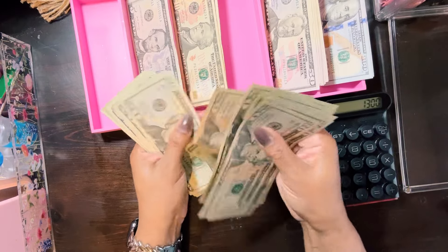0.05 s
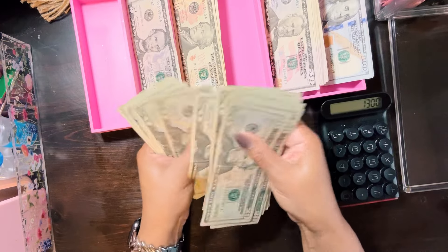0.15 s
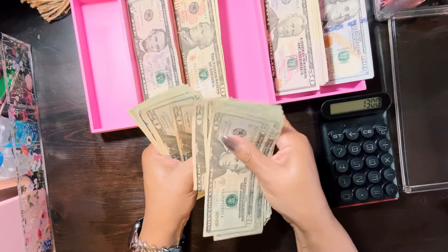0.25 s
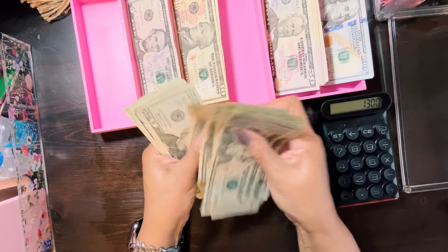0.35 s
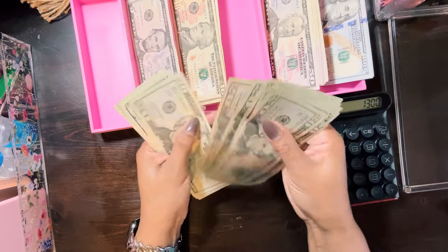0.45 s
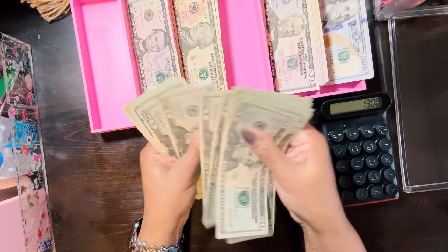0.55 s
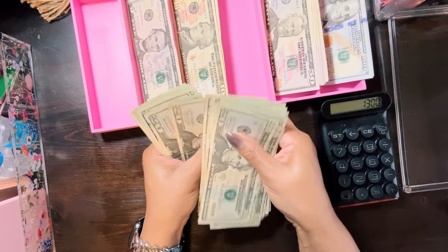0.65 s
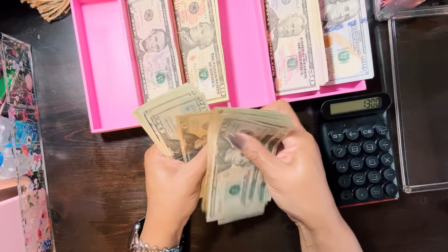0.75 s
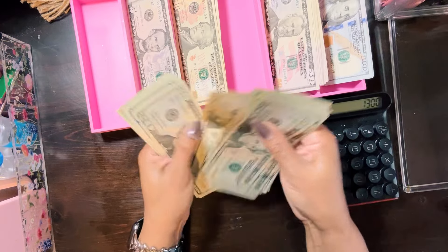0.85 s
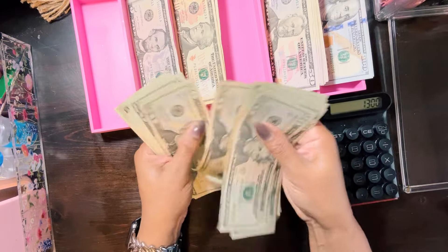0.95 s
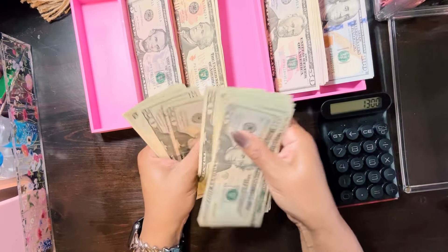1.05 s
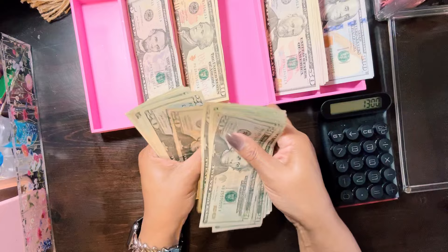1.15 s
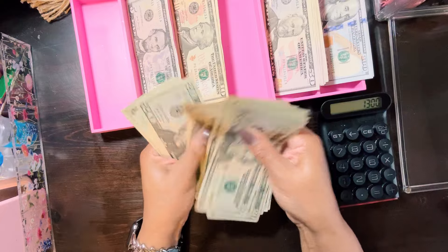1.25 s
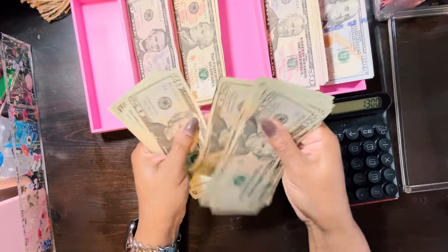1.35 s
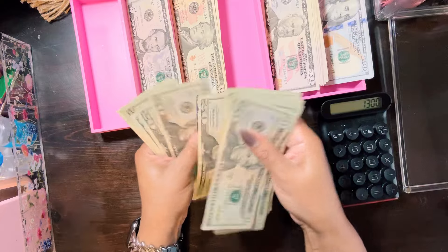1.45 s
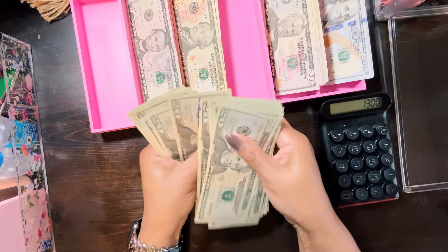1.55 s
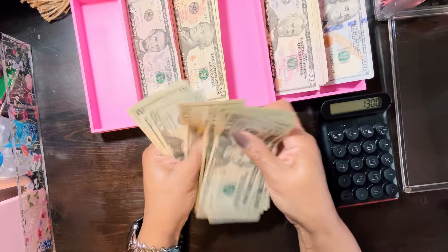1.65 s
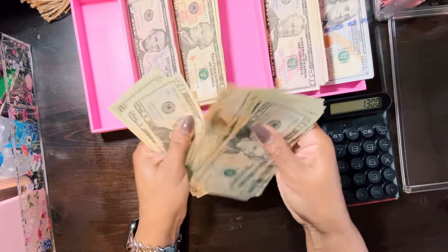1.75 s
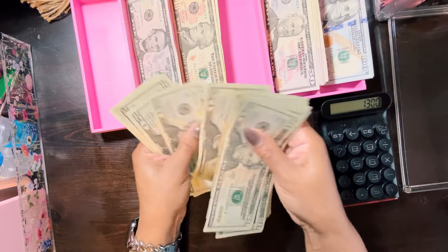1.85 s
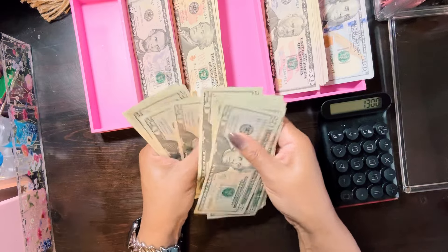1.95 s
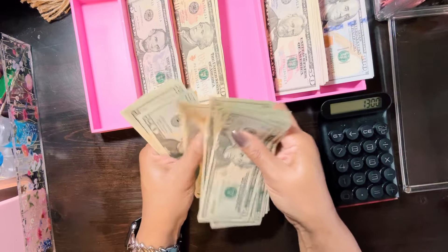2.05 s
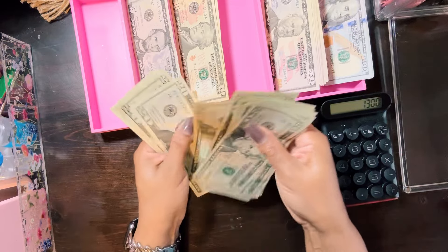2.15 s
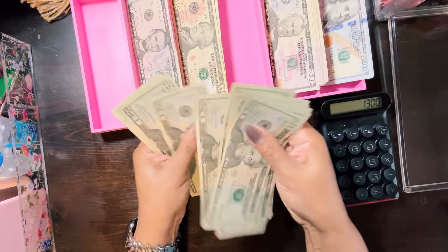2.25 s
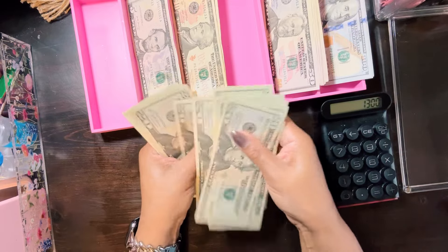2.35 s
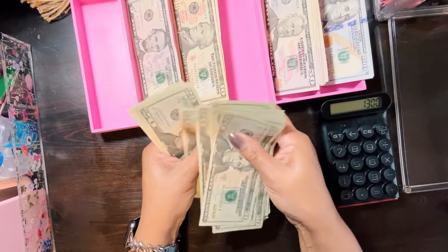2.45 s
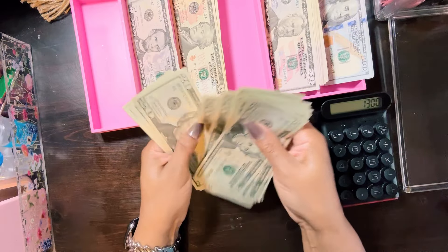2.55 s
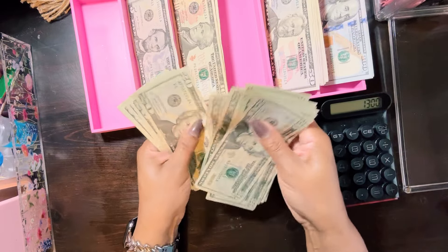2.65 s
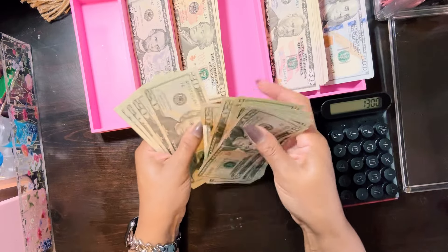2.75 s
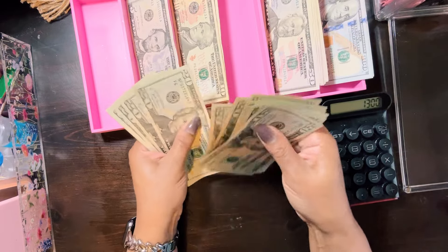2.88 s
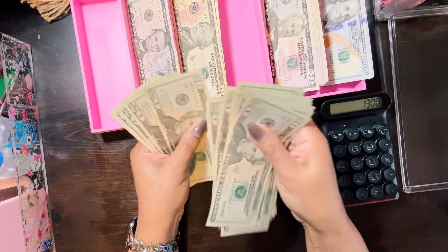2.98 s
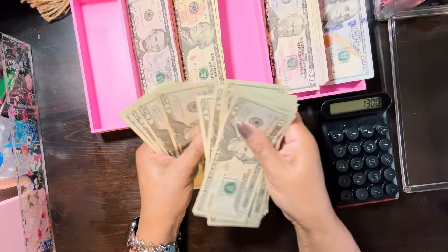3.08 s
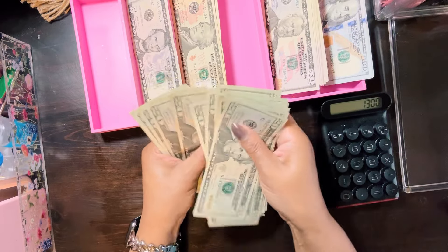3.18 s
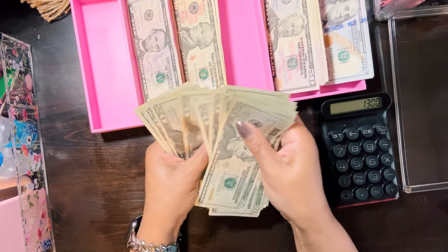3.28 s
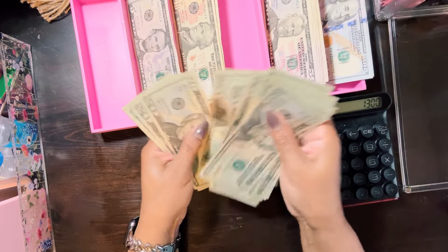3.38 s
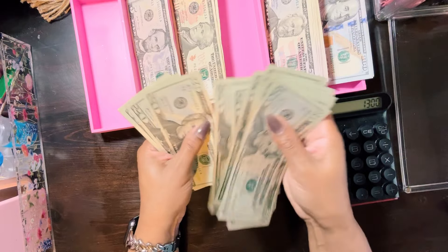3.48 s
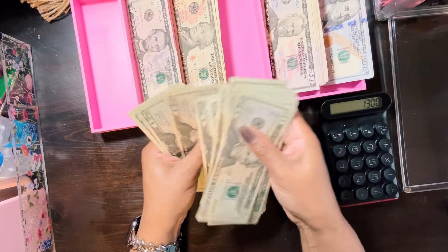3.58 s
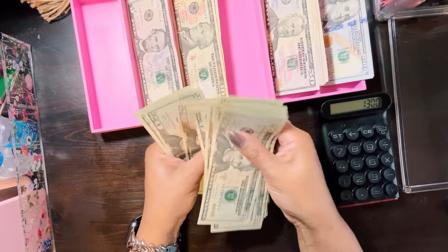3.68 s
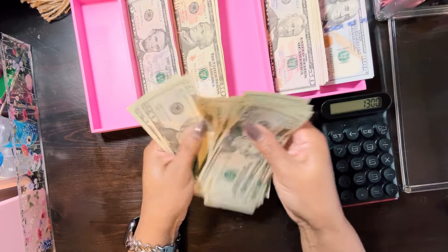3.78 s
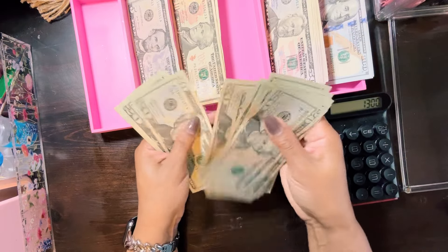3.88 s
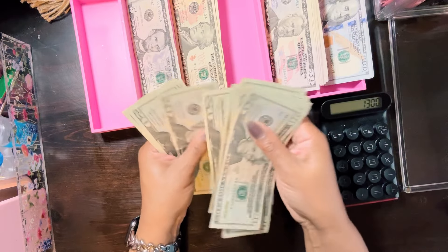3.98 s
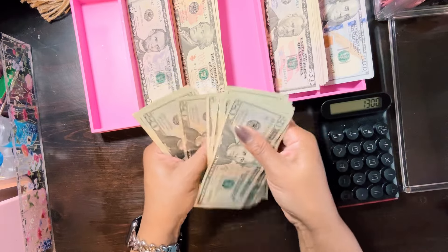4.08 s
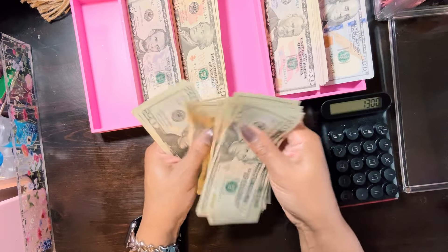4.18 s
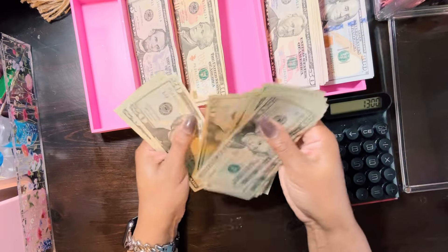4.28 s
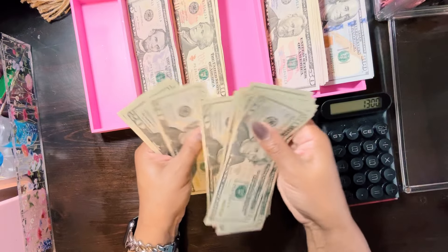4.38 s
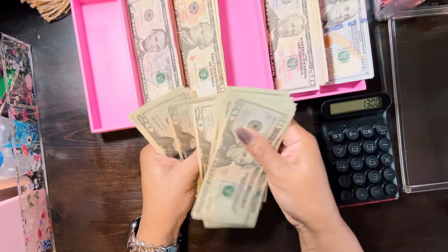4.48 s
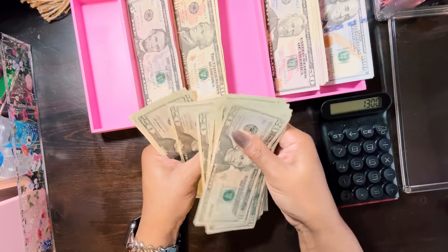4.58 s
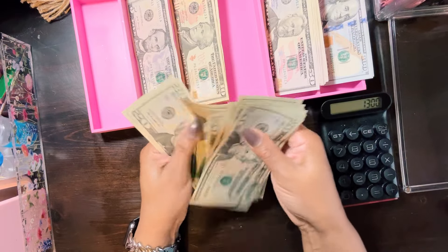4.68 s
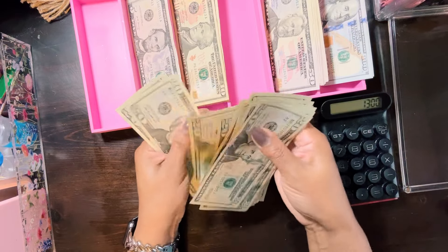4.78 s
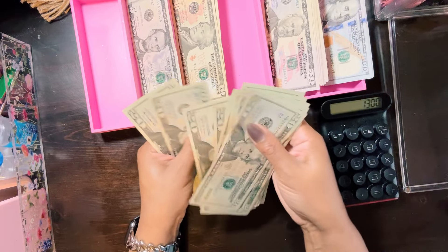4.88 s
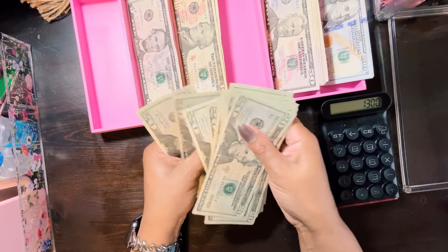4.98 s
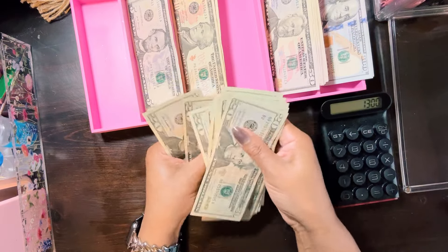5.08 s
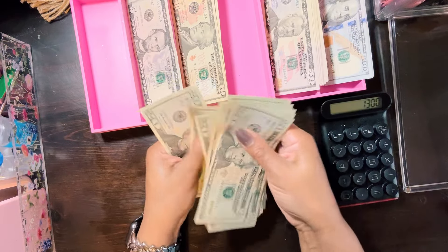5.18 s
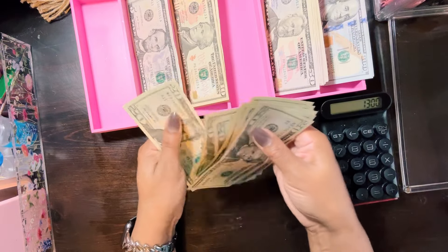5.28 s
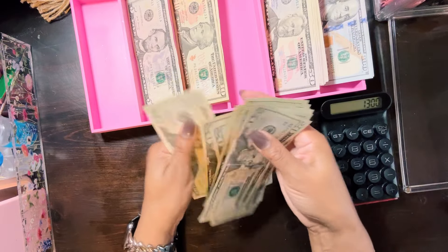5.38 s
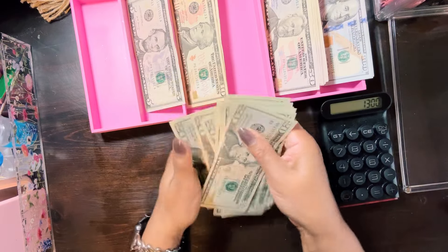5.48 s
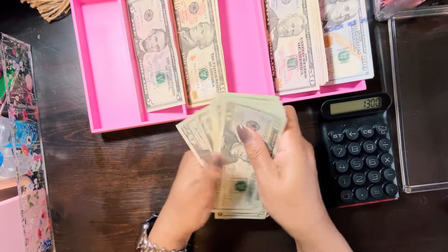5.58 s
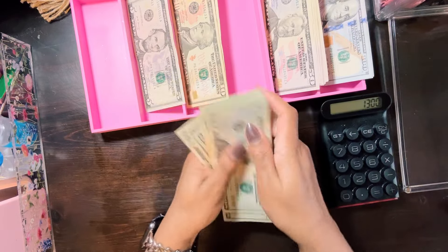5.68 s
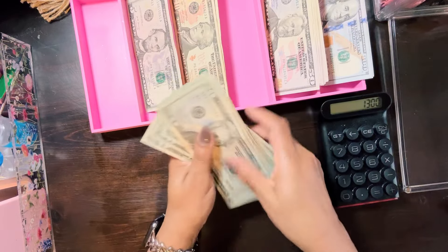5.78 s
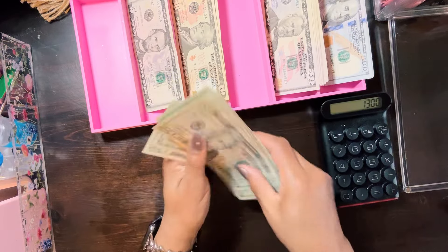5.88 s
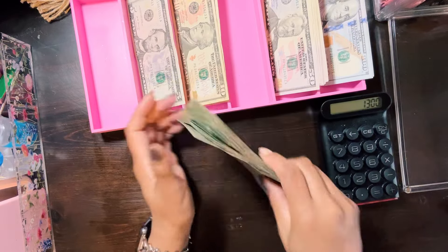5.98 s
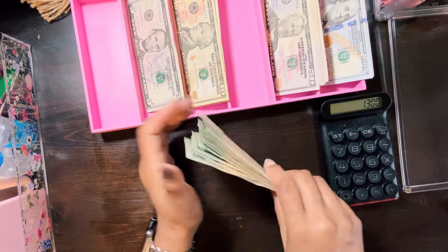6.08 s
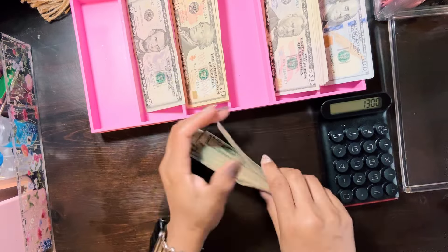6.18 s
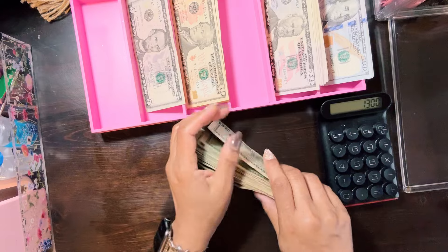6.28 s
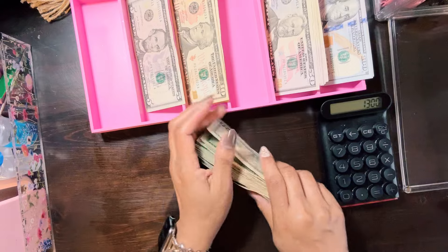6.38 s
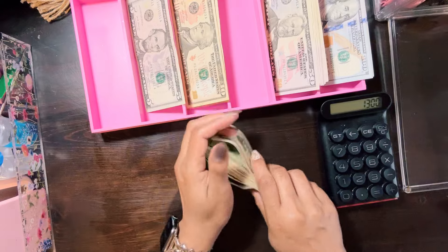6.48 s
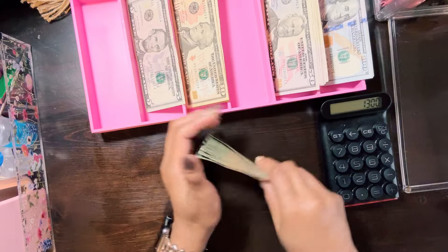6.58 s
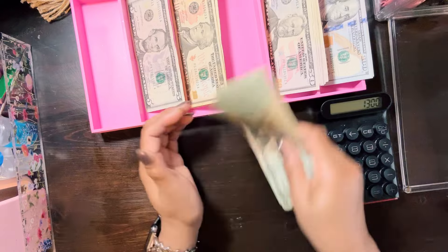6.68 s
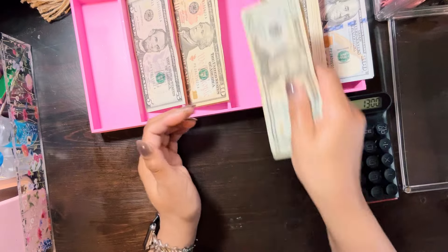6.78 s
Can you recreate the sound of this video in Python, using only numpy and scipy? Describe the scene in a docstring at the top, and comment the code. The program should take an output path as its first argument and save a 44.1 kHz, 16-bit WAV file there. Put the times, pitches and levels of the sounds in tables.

```python
"""Paper notes are counted by hand over a wooden desk, close under a phone with two microphone openings.
Each note rubs off the stack with a grainy hiss and pushes out a puff of air as it lands. Creases snap,
thumbs flick edges, and one note squeaks as it rubs. At the end the stack is knocked on the desk.
The small, soft room adds a short echo, and the house rumbles quietly underneath."""
import sys
import numpy as np
from scipy import signal
from scipy.fft import rfft, irfft, next_fast_len
from scipy.io import wavfile
from scipy.ndimage import uniform_filter1d, map_coordinates

SR = 44100
rng = np.random.default_rng(int(sys.argv[2]) if len(sys.argv) > 2 else 0)


def store_wav(level_fs):
    """Save 16-bit WAV to argv[1]."""
    pcm = np.round(np.clip(np.atleast_2d(level_fs), -1, 1) * 32767)
    wavfile.write(sys.argv[1], SR, pcm.T.astype(np.int16))


N = 301644

# A note is drawn off, or the stack is squared: t/s, length/s, rub level/dB, hiss level/dB
SLIDES = [(-.05, 0.034, -33.5, -36.5), (0.163, 0.012, -48, -57), (0.357, 0.052, -40, -41.5),
          (0.607, 0.0065, -47.5, -70), (0.813, 0.074, -40, -43), (1.258, 0.083, -41.5, -43.5),
          (1.675, 0.085, -40, -39), (1.918, 0.059, -50, -53), (2.065, 0.073, -46, -45),
          (2.508, 0.076, -40, -46), (2.671, 0.0063, -41, -45), (2.882, 0.0074, -49, -69),
          (3.335, 0.075, -45.5, -43), (3.739, 0.076, -47, -46), (3.935, 0.018, -56, -54.5),
          (4.194, 0.062, -46.5, -45.5), (4.649, 0.089, -47.5, -43.5), (5.172, 0.1, -47.5, -50),
          (5.415, 0.057, -53, -53.5), (5.739, 0.1, -55.5, -52), (5.926, 0.024, -63, -52.5),
          (6.528, 0.042, -51, -57.5)]
# Fingers shift the notes, as strong as just after a slide: t/s, rub level/dB, hiss level/dB
FINGERING = [(0, -69, -73), (.3, -50, -56), (.6, -61, -63.5), (1.07, -52, -47), (1.19, -55, -62),
             (1.4, -52, -57), (1.9, -54.5, -56), (2.5, -47, -55), (3.1, -57, -62), (3.601, -58, -57),
             (3.9, -58.5, -61.5), (4.4, -56, -54.5), (4.8, -58, -54.5), (4.9, -54, -52), (5.362, -64, -71),
             (5.62, -51.5, -50.5), (5.98, -58.5, -56), (6.07, -80, -73.5), (6.145, -50, -61),
             (6.2, -38.5, -59), (6.36, -43.5, -60), (6.42, -43.5, -54.5), (6.49, -47, -58),
             (6.601, -62.5, -76), (6.668, -86, -97), (6.84, -77, -75)]
# The broad pitches at which the held stack rings: f/Hz, width/Hz, level/dB
STACK_RESONANCES = [(873, 350, 8), (1820, 286, 9), (2586, 610, 5.5), (4130, 740, 2.5), (6100, 2550, -6)]
# The tone of hissing paper fibres: f/Hz, level/dB
HISS_TONE = [(2000, -14.5), (4500, -2.5), (6500, 0), (8500, -0.5), (11000, -2.5), (14000, -5), (15800, -11)]
# The tone of a flapping note: f/Hz, level/dB
FLAP_TONE = [(60, -4.5), (130, -4), (300, 4.5), (500, 7.5), (900, -84.5)]
# The tone of the house's rumble: f/Hz, level/dB
RUMBLE_TONE = [(15, -80), (25, -47), (42, -10), (64, -0.5), (87, -10), (110, -4), (140, -8.5), (195, -20),
               (887, -33), (1650, -29.5), (2910, -43), (10700, -55), (14000, -47), (16000, -59)]
# The loudness that the rumble wavers around: t/s, level/dB
RUMBLE_LEVELS = [(0, -64), (2, -65), (4.5, -65.5), (6, -65.5), (6.84, -66.5)]
# A note lands and pushes out air: t/s, level/dB, f/Hz
LANDINGS = [(0.009, -42, 380), (0.07, -39.5, 400), (0.38, -51.5, 398), (0.441, -44.5, 337),
            (0.619, -50, 271), (0.81, -39.5, 344), (0.866, -40, 347), (1.312, -38, 407),
            (1.742, -43.5, 149), (2.101, -45, 340), (2.145, -44.5, 149), (2.185, -47.5, 148),
            (2.58, -49, 108), (2.659, -39.5, 410), (3.406, -43.5, 176), (3.534, -64, 253),
            (3.876, -46.5, 112), (4.134, -51.5, 354), (4.256, -52, 104), (4.751, -53, 95),
            (5.242, -52, 153), (5.833, -59, 123), (6.153, -33.5, 323), (6.372, -46, 297),
            (6.51, -49.5, 130)]
# Creases, flicks and knocks: t/s, level/dB, f/Hz, fade/s, crack offset/dB
# (a fade is the time a sound takes to drop by 60 dB)
PAPER_SNAPS = [(0.075, -17, 1980, 0.017, -18), (0.078, -23, 800, 0.043, -30),
               (0.084, -21, 1890, 0.028, -37), (0.095, -24, 1920, 0.071, -41),
               (0.183, -33, 920, 0.059, -17), (0.277, -36.5, 950, 0.035, -33),
               (0.323, -30, 890, 0.047, -24), (0.345, -24, 3260, 0.042, -32),
               (0.3455, -28.5, 1850, 0.051, -35), (0.438, -26.5, 1440, 0.04, -37),
               (0.613, -29.5, 730, 0.14, -25), (0.632, -24.5, 1820, 0.045, -18),
               (0.685, -17.5, 3440, 0.016, -35), (0.73, -35, 1050, 0.09, -34),
               (0.737, -29.5, 1570, 0.028, -29), (0.766, -31, 824, 0.018, -38),
               (0.818, -19.5, 2670, 0.03, -15.5), (0.8205, -18.5, 4000, 0.016, -25),
               (0.8225, -25, 915, 0.025, -30), (0.868, -29, 1010, 0.03, -18), (0.874, -15, 895, 0.023, -32),
               (0.8795, -18.5, 4200, 0.025, -25), (1.033, -35, 1930, 0.17, -18),
               (1.135, -35, 886, 0.069, -38.5), (1.163, -38.5, 970, 0.037, -28),
               (1.21, -31.5, 920, 0.03, -36), (1.248, -25.5, 1800, 0.05, -28),
               (1.292, -26, 770, 0.028, -27), (1.311, -20.5, 1050, 0.015, -35),
               (1.3185, -10, 2530, 0.02, -30), (1.3195, -14.5, 880, 0.023, -30),
               (1.32, -3, 4530, 0.011, -42), (1.33, -25, 980, 0.02, -28), (1.574, -30.5, 920, 0.016, -33.5),
               (1.587, -30.5, 1280, 0.035, -38), (1.606, -24, 970, 0.025, -39),
               (1.645, -41, 1810, 0.06, -25), (1.685, -36, 950, 0.035, -25),
               (1.744, -20.5, 1090, 0.063, -42), (1.757, -22.5, 955, 0.04, -17),
               (1.956, -29.5, 890, 0.041, -17.5), (1.977, -29.5, 870, 0.053, -46),
               (2.052, -43, 890, 0.056, -25), (2.067, -26, 2520, 0.023, -28),
               (2.083, -26, 1280, 0.067, -31), (2.096, -25, 840, 0.051, -26),
               (2.107, -24.5, 770, 0.027, -28), (2.115, -24.5, 940, 0.049, -20),
               (2.125, -28, 1490, 0.015, -22), (2.171, -27, 4150, 0.025, -34),
               (2.179, -26.5, 1820, 0.054, -37), (2.322, -30, 1610, 0.033, -49),
               (2.368, -34, 980, 0.028, -35), (2.442, -30, 1010, 0.049, -30),
               (2.482, -27, 1980, 0.064, -19.5), (2.5055, -18.5, 1810, 0.048, -21.5),
               (2.515, -19.5, 1820, 0.055, -29), (2.5362, 0.5, 3370, 0.0065, -25),
               (2.543, -15.5, 3460, 0.02, -32), (2.555, -22.5, 3380, 0.08, -34),
               (2.567, -21, 1690, 0.032, -19), (2.598, -22, 2000, 0.04, -25), (2.605, -15, 796, 0.037, -22),
               (2.616, -16, 2180, 0.032, -25), (2.658, -28, 3000, 0.018, -30),
               (2.671, -19, 850, 0.042, -22), (2.6725, -20, 1780, 0.04, -18.5),
               (2.674, -11.5, 3450, 0.029, -30), (2.679, -18.5, 3500, 0.036, -30),
               (2.73, -24.5, 1840, 0.023, -37), (2.877, -27.5, 1760, 0.02, -22.5),
               (2.897, -22, 1930, 0.036, -31), (2.976, -38, 1990, 0.072, -15),
               (2.993, -28, 2430, 0.042, -18.5), (2.998, -29, 1900, 0.073, -35),
               (3.209, -39.5, 820, 0.091, -15.5), (3.2615, -28, 4000, 0.0093, -35),
               (3.2625, -25, 870, 0.022, -36), (3.27, -30.5, 1720, 0.04, -37),
               (3.412, -24, 1210, 0.045, -14.5), (3.42, -22.5, 800, 0.021, -21),
               (3.649, -37, 1850, 0.03, -30), (3.657, -34, 980, 0.02, -28),
               (3.684, -29.5, 3220, 0.022, -28), (3.685, -28.5, 1020, 0.027, -35),
               (3.6965, -28.5, 2600, 0.035, -26), (3.77, -28.5, 1050, 0.044, -14),
               (3.813, -29.5, 930, 0.042, -22), (3.859, -30.5, 1940, 0.074, -41),
               (3.873, -22, 860, 0.02, -40), (3.896, -31.5, 776, 0.019, -35), (4.131, -37, 980, 0.027, -36),
               (4.141, -25.5, 940, 0.02, -45), (4.252, -34, 1020, 0.041, -35),
               (4.3665, -20.5, 3900, 0.021, -41), (4.367, -31, 1670, 0.02, -35),
               (4.561, -39.5, 660, 0.15, -39), (4.621, -34.5, 710, 0.047, -43),
               (4.652, -26.5, 1820, 0.066, -18), (4.662, -27, 1440, 0.064, -30),
               (4.672, -26, 1290, 0.078, -25), (4.763, -30.5, 1800, 0.049, -18),
               (4.85, -48, 2500, 0.072, -1.5), (5.123, -35.5, 1110, 0.028, -21),
               (5.149, -32, 920, 0.027, -19), (5.167, -40, 900, 0.031, -25), (5.217, -29, 930, 0.045, -25),
               (5.288, -40, 1070, 0.04, -21), (5.44, -36, 890, 0.03, -31), (5.453, -32, 4100, 0.024, -32),
               (5.467, -33.5, 1500, 0.04, -48), (5.48, -34.5, 1080, 0.039, -35),
               (5.53, -28, 925, 0.011, -32), (5.564, -34, 1660, 0.025, -36), (5.59, -28.5, 880, 0.048, -37),
               (5.593, -35, 1560, 0.043, -37), (5.613, -30, 905, 0.03, -35),
               (5.621, -33.5, 1420, 0.04, -28), (5.676, -35, 980, 0.023, -35),
               (5.691, -30, 1740, 0.048, -31), (5.692, -30, 915, 0.04, -39), (5.793, -25, 1720, 0.026, -21),
               (5.868, -34, 1600, 0.03, -23), (5.947, -36.5, 2770, 0.032, -18),
               (5.978, -36, 1540, 0.063, -17), (6.101, -34.5, 1340, 0.035, -47),
               (6.153, -9.5, 4200, 0.082, -21), (6.158, -17, 3100, 0.054, -28),
               (6.162, -7, 1750, 0.045, -12.5), (6.169, -16, 1730, 0.18, -10.5),
               (6.178, -19.5, 2500, 0.037, -22), (6.273, -14.5, 2600, 0.016, -28),
               (6.2755, -6, 2480, 0.014, -28), (6.281, -23.5, 2290, 0.12, -39),
               (6.309, -30, 2400, 0.099, -41), (6.412, -35, 1940, 0.077, -36),
               (6.5155, -28.5, 1110, 0.043, -32.5), (6.739, -44.5, 1680, 0.015, -31.5)]
# Thin squeaks of one rubbing note: t/s, length/s, starting f/Hz
NOTE_SQUEAKS = [(3.297, .028, 6150), (3.326, .018, 5350), (3.338, .014, 7050), (3.35, .04, 5950),
                (3.386, .045, 7850), (3.428, .014, 8200), (3.432, .025, 6700)]
# How long the room echoes: f/Hz, fade/s
ROOM_FADES = [(200, 0.17), (2000, 0.11), (10000, 0.084)]
# How the two microphone openings compare: f/Hz, likeness (0-1), right's lead/rad, left over right/dB
MIC_OPENINGS = [(60, .985, 0, -.3), (160, .93, 0, -1), (400, .62, .05, 1), (1000, .7, .35, 1),
                (1750, .55, 1.1, 4), (2500, .35, 2.6, 2), (3100, .2, 4.8, 3), (3600, .55, 6.3, 3.5),
                (4200, .65, 6, 1.5), (4900, .55, 4.9, .5), (6700, .85, 4.7, .5), (7300, .85, 4.1, 0),
                (7900, .995, 3.14, 0), (10300, .995, 3.14, 0), (11300, .9, 2, 0), (13300, .995, 0, 0)]


def amp(db):
    """Turn decibels into a number to multiply by."""
    return 10 ** (np.asarray(db) / 20)


def unit(x):
    """Scale a signal to an average power of 1."""
    return x / np.sqrt(np.mean(x ** 2) + 1e-20)


def along(points, hz):
    """Look up a table's columns at any frequency, on a log scale."""
    f, *cols = np.transpose(points)
    return np.squeeze([np.interp(np.log(hz + 1), np.log(f + 1), c) for c in cols])


def wobble(per_s):
    """A smooth curve through per_s random values a second."""
    return map_coordinates(rng.standard_normal(int(N * per_s / SR) + 4), [np.arange(N) * per_s / SR])


def filtered(x, response):
    """Multiply each frequency in x by response(hz)."""
    size = next_fast_len(N + SR // 2)
    return irfft(rfft(x, size) * response(np.fft.rfftfreq(size, 1 / SR)), size)[..., :N]


def coloured(x, tone):
    """Shape x with a tone table."""
    return filtered(x, lambda hz: amp(along(tone, hz)))


def stack_ring(x, depth_db):
    """The stack rings when shaken. Bending moves its resonances, so narrow bands swell and fade."""
    def response(f):
        return sum((-1) ** k * amp(db) * 1j * f * width / (hz * hz - f * f + 1j * f * width)
                   for k, (hz, width, db) in enumerate(STACK_RESONANCES))
    bands = signal.stft(filtered(x, response), nperseg=512)[2]
    drift = uniform_filter1d(rng.standard_normal(bands.shape[1:]), size=4, axis=0)
    drift = uniform_filter1d(drift, size=8, axis=1)
    return signal.istft(bands * amp(depth_db * unit(drift)), nperseg=512)[1][:, :N]


def hand_effort():
    """How strong the rub and hiss are: each slide rises and falls, then the fingers settle."""
    rise_db_per_s, fall_db_per_s = 447, 305.5
    settle_db_per_s, change_db = [18, 29], [2.5, -4.5]  # each is [rub, hiss]
    step = 32  # samples per value
    t = np.arange(0, N, step) / SR
    times, *finger_levels = np.transpose(FINGERING)
    finger_db = np.array([np.interp(t, times, levels) for levels in finger_levels])
    ends = np.array([start + length for start, length, *_ in SLIDES])
    since_slide = (t - ends[(np.searchsorted(ends, t) - 1).clip(0)]).clip(0)
    settle_db = -uniform_filter1d(np.outer(settle_db_per_s, since_slide), size=2000 // step)
    power = amp(2 * (finger_db + settle_db))
    for start, length, *levels_db in SLIDES:
        edge_db = -rise_db_per_s * (start - t).clip(0) - fall_db_per_s * (t - start - length).clip(0)
        swell_db = np.outer(change_db, ((t - start) / length).clip(0, 1) - .5)
        power += amp(2 * (np.array(levels_db)[:, None] + swell_db + edge_db))
    return np.repeat(np.sqrt(power), step, axis=1)[:, :N]


def fibre_grit(per_s, spread_db, roughness):
    """Two separate noises, roughened at the same moments by fibres that catch and let go."""
    catches = (rng.random(N) < per_s / SR) * amp(spread_db * rng.standard_normal(N))
    jolts = signal.fftconvolve(catches, amp(-60 * np.arange(800) / SR / 0.074))[:N]
    return (1 + roughness * unit(jolts)) * rng.standard_normal((2, N))


def sliding():
    """Rubbing makes the stack ring, fibres hiss, and the swinging note flaps."""
    rub_gain, hiss_gain = hand_effort()
    jerk_db = 1.5 * wobble(30)
    rub = unit(stack_ring(fibre_grit(150, spread_db=-3.5, roughness=0.84), depth_db=3.5))
    hiss = coloured(fibre_grit(430, spread_db=5.5, roughness=0.39), HISS_TONE)
    hiss = unit(bending(hiss, depth_db=3.5))
    flap = amp(-15 + 1.9 * wobble(23)) * unit(coloured(rng.standard_normal((2, N)), FLAP_TONE))
    return amp(jerk_db) * (rub_gain * (rub + flap) + hiss_gain * hiss)


def bending(x, depth_db):
    """A bending note moves its resonances: narrow bands of sound swell and fade at random."""
    bands = signal.stft(x, nperseg=512)[2]
    drift = uniform_filter1d(rng.standard_normal(bands.shape[1:]), size=4, axis=0)
    drift = uniform_filter1d(drift, size=8, axis=1)
    return signal.istft(bands * amp(depth_db * unit(drift)), nperseg=512)[1][:, :N]


def rumble():
    """The house gives a low, wavering rumble with a faint hiss."""
    level_db = np.interp(np.arange(N) / SR, *np.transpose(RUMBLE_LEVELS))
    waver_db = 1.1 * wobble(3) + 2.4 * wobble(22)
    return amp(level_db + waver_db) * unit(coloured(rng.standard_normal((2, N)), RUMBLE_TONE))


def air_puffs(length_s=0.037):
    """A landing note pushes out air: a soft swell of low noise."""
    out = np.zeros((2, N + SR))
    progress = np.linspace(0, 1, round(length_s * SR))
    swell = np.sin(np.pi * progress ** 0.92) ** 2
    for start, db, hz in LANDINGS:
        band = signal.butter(1, [hz / 1.62, hz * 2], "bandpass", fs=SR, output="sos")
        air = unit(signal.sosfilt(band, rng.standard_normal((2, len(swell) + 2000)))[:, 2000:])
        out[:, round(start * SR):][:, :len(swell)] += amp(db) * swell * air
    return out[:, :N]


def crinkles(count=220, fade_s=0.0041, crack_db=-28.5):
    """Table rows for tiny snaps at random moments, louder when the rubbing is stronger."""
    times = (np.arange(count) + rng.random(count)) * N / SR / count
    level_draw, pitch_draw = rng.standard_normal((count, 2)).T
    rub_db = 20 * np.log10(hand_effort()[0][(times * SR).astype(int)])
    db = rub_db - 9 + 7 * level_draw
    hz = 2440 * np.exp(0.38 * pitch_draw)
    return [(*row, fade_s, crack_db) for row in zip(times, db, hz)]


def snaps(rise_cycles=1.8, swing_cycles=9, crack_rise_s=.0015, crack_fade_s=0.009):
    """Each snap swings briefly at its own pitch, shakes the stack, cracks and thuds."""
    ring, shake, crack, thud = np.zeros((4, 2, N + SR))
    for start, db, hz, fade_s, crack_db in [*PAPER_SNAPS, *crinkles()]:
        fade_s = np.clip(fade_s, .004, .15)
        t = np.arange(round((fade_s + .02) * SR)) / SR
        at = slice(round(start * SR), round(start * SR) + len(t))
        attack = amp(db) * (1 - np.exp(-t * hz / rise_cycles))
        shake_noise, crack_noise, thud_noise = rng.standard_normal((3, 2, len(t)))
        swing = np.sin(2 * np.pi * hz * t + [[0], [np.pi / 2]])
        near_pitch = unit(signal.lfilter(*signal.iirpeak(min(hz, SR / 4), Q=3, fs=SR), shake_noise))
        ring[:, at] += attack * amp(3 - 60 * t * hz / swing_cycles) * swing
        ring[:, at] += attack * amp(-11.5 - 60 * t / fade_s) * near_pitch
        shake[:, at] += attack * amp(-13 - 60 * t / fade_s) * shake_noise
        crack_attack = amp(db + crack_db + 19) * (1 - np.exp(-t / crack_rise_s))
        flutter = amp(-10 - 60 * t / (0.7 * fade_s))
        crack[:, at] += crack_attack * (amp(-60 * t / crack_fade_s) + flutter) * crack_noise
        thud[:, at] += attack * amp(-21.5 - 60 * t / (fade_s + 0.0053)) * thud_noise
    shake = stack_ring(shake[:, :N], depth_db=5.5)
    crack = coloured(crack[:, :N], HISS_TONE)
    # The thud keeps a broad band around 320 Hz.
    thud = filtered(thud[:, :N], lambda f: (380j * f / (320 ** 2 - f * f + 380j * f)) ** 2)
    return ring[:, :N] + shake + crack + thud


def squeaks(up_hz_per_s=17000, down_hz_per_s=-50000, turn_s=3.42):
    """A rubbing note gives trembling tones that glide up, then down once it turns over."""
    out = np.zeros((2, N))
    for start, length, from_hz in NOTE_SQUEAKS:
        progress = np.linspace(0, 1, round(length * SR))
        at = slice(round(start * SR), round(start * SR) + len(progress))
        glide = up_hz_per_s if start < turn_s else down_hz_per_s
        cycles = np.cumsum(from_hz + glide * length * progress) / SR
        tremble = amp(-45 + 1.7 * wobble(250)[at])
        swell = np.sqrt(np.sin(np.pi * progress).clip(0))
        out[:, at] += tremble * swell * np.sin(2 * np.pi * cycles + [[0], [np.pi / 2]])
    return out


def room_echo(x):
    """The room answers a moment later, and each frequency dies away at its own speed."""
    hz, t, bands = signal.stft(rng.standard_normal((2, SR // 2)), SR, nperseg=256)
    tail = signal.istft(bands * amp(-60 * t / along(ROOM_FADES, hz)[:, None]), SR, nperseg=256)[1]
    delayed = np.pad(x, ((0, 0), (200, 0)))
    return signal.fftconvolve(delayed, tail / np.linalg.norm(tail[0]), axes=1)[:, :N]


def scene():
    """Paper, echo and rumble, as two unrelated signals of the same events."""
    paper = sliding() + snaps() + squeaks() + air_puffs()
    return paper + amp(-10) * room_echo(paper) + rumble()


def record(dry):
    """Both openings share one signal and differ by the other; the phone's body shifts their timing."""
    rounded = dry / (1 + np.abs(dry / .45) ** 4) ** (1 / 4)  # softens loud peaks

    def opening(side):
        def response(hz):
            likeness, lead, pan_db = along(MIC_OPENINGS, hz)
            mix_angle = np.arccos(np.clip(likeness, 0, 1)) / 2
            treble_cut = np.clip((16100 - hz) / 500, 0, 1) ** 2
            shift = amp(side * pan_db / 2) * np.exp(-.5j * side * lead)
            return shift * treble_cut * [np.cos(mix_angle), side * np.sin(mix_angle)]
        return filtered(rounded, response).sum(axis=0)
    return np.array([opening(1), opening(-1)])  # left, right


dry = scene()
out = record(dry)
store_wav(out)
```